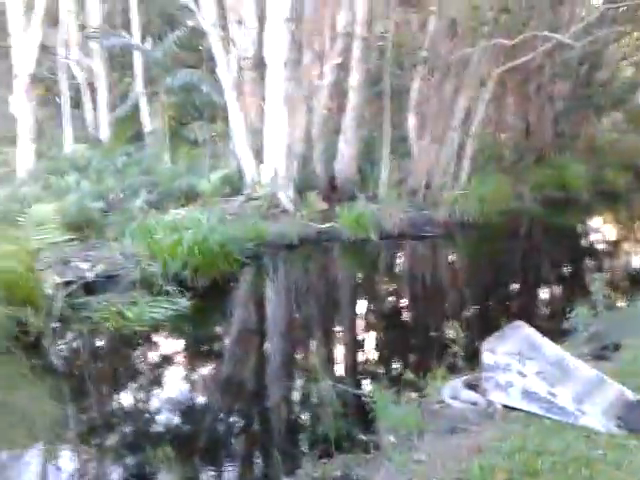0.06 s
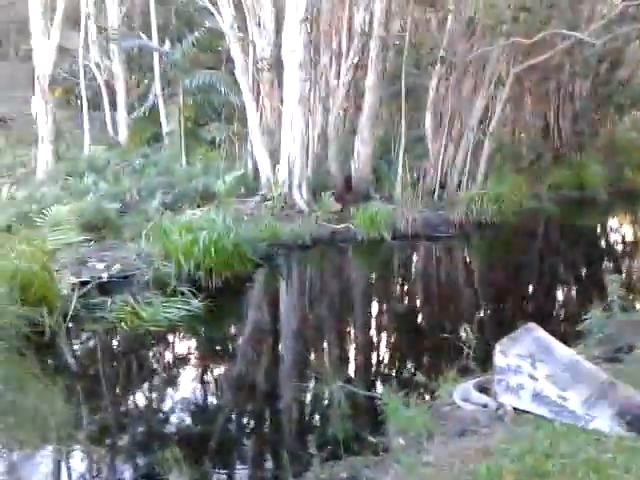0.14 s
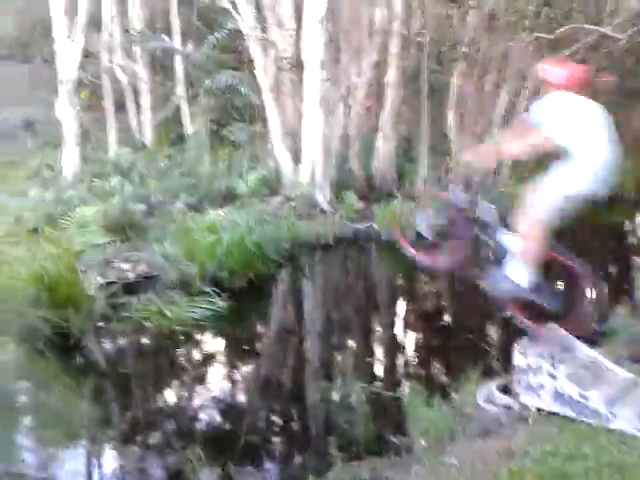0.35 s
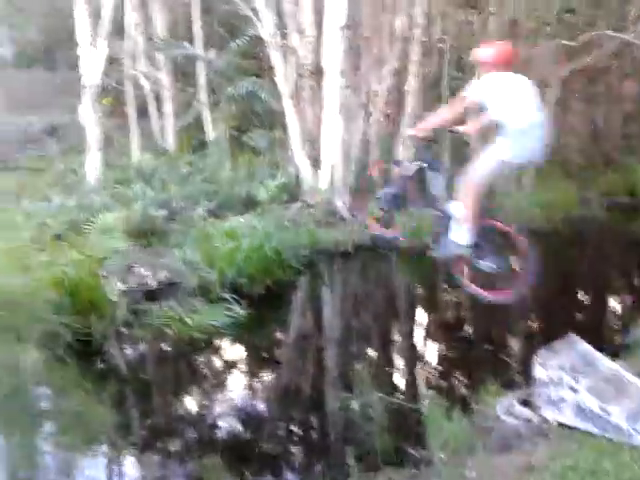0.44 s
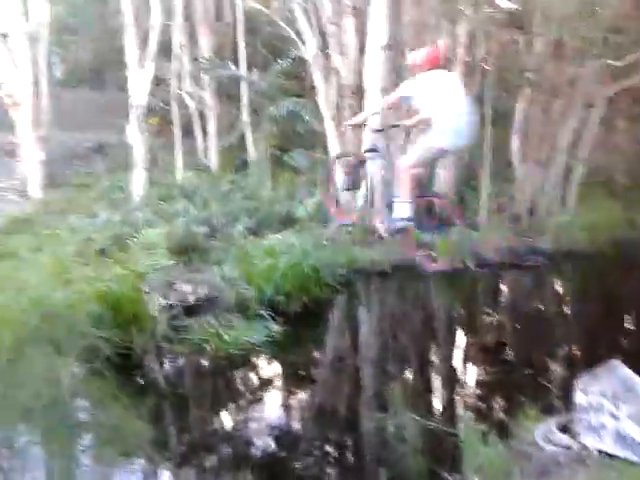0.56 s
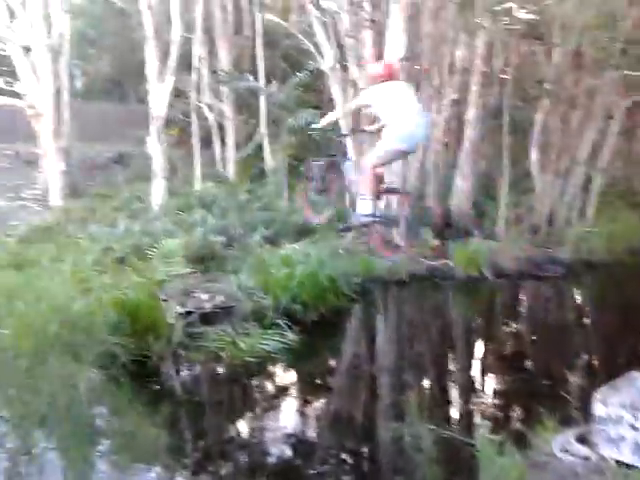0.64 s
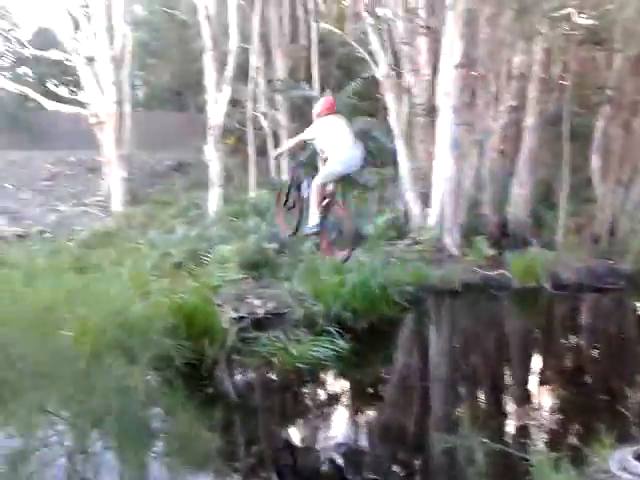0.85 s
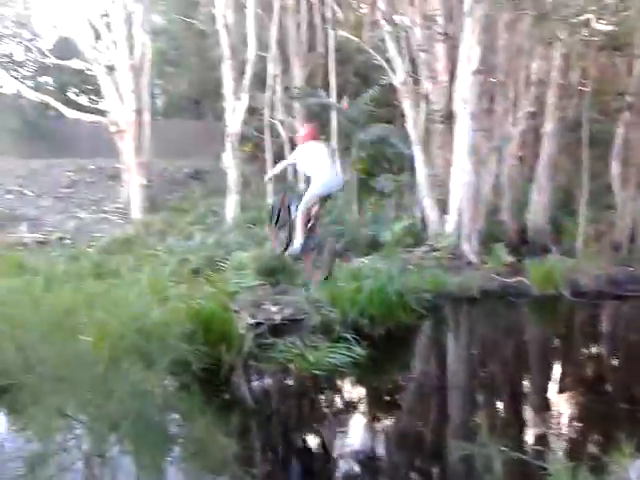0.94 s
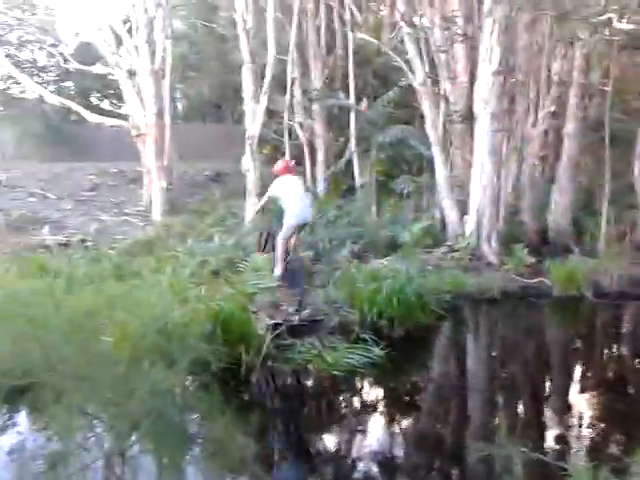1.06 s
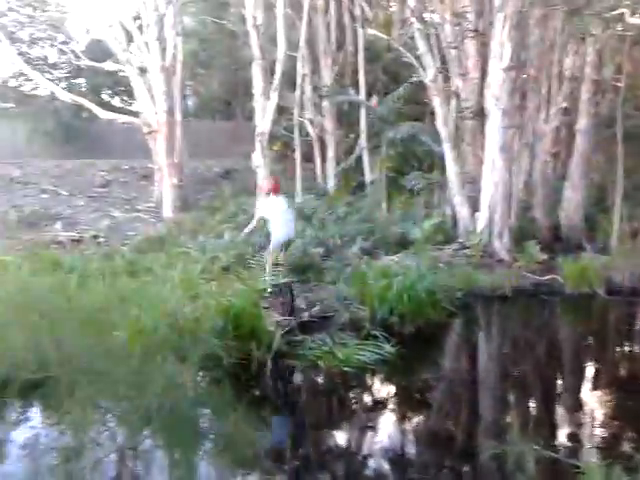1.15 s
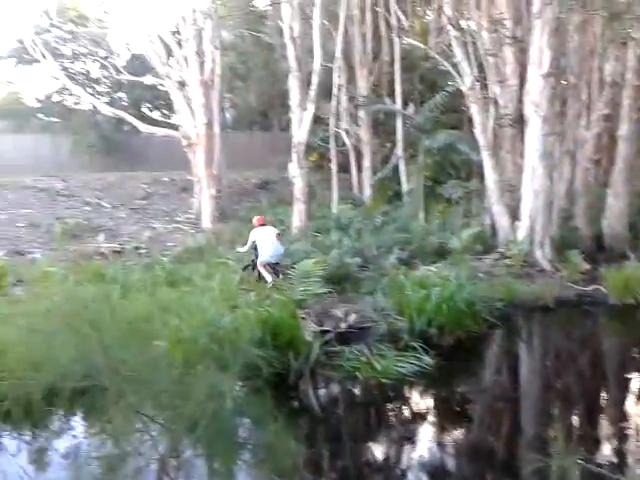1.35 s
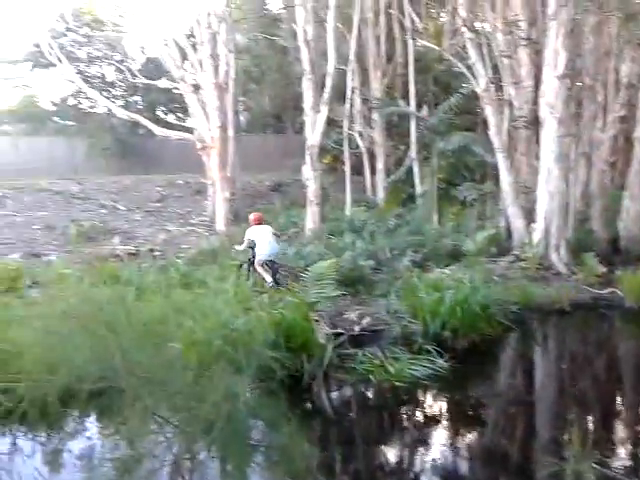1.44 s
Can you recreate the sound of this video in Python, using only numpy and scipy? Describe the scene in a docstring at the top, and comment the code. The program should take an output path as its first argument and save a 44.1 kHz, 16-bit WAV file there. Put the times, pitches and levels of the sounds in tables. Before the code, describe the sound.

A bicycle coasts up with a hissing freewheel and hits a board ramp close by, with two clacking, booming thumps at about 0.2 and 0.3 seconds, the second loudest. The hiss fades as it flies away. At about 1.2 seconds it lands more quietly with a sharp, hollow knock and a crunch of dirt and twigs, rattling lightly until 1.5 seconds. Light wind rumbles underneath.

```python
"""A creek bank outdoors, one microphone by a board ramp: a bicycle coasts up, jumps and lands across it.
Close by, each wheel clacks on the lip and thumps the board into a boom, and the tyre tread hums over it.
The freewheel's pawls hiss away through the air. On the far bank the tyres crunch into dirt and twigs
and the bike rattles on. Light wind and a distant outdoor wash lie underneath."""
import sys
import numpy as np
from scipy import signal
from scipy.fft import rfft, irfft
from scipy.io import wavfile

SR = 44100
rng = np.random.default_rng(int(sys.argv[2]) if len(sys.argv) > 2 else 0)


def transcribe(u):
    """Save the signal u as a 16-bit wav file named by the first command-line argument.

    u: samples, shape (n,) or (channels, n), limited to [-1, 1]; the rate is SR.
    q: integer samples, one column per channel.
    """
    v = np.clip(np.atleast_2d(u).T, -1, 1)
    q = np.round(v * 32767).astype(np.int16)
    wavfile.write(sys.argv[1], SR, q)


N = 66150
TIME = np.arange(N) / SR

# spectrum of chatter and scuffing on the ramp: (frequency [Hz], level [dB])
CHATTER_SPECTRUM = [(60, -8.5), (200, -6.5), (400, -7), (1100, -7), (1450, -20.5), (1900, -16),
                    (3500, -17.5), (6000, -19), (9000, -32), (16000, -52)]


def from_db(db):
    """Decibels to gain."""
    return 10 ** (np.asarray(db) / 20)


def unit_rms(x):
    """Scale to unit power."""
    return x / np.sqrt(np.mean(x ** 2) + 1e-20)


def fader(points):
    """Gain over time from (time [s], level [dB]) points."""
    return from_db(np.interp(TIME, *np.transpose(points)))


def drift(rate_hz):
    """Smooth random wander of unit power."""
    pole = np.exp(-2 * np.pi * rate_hz / SR)
    return unit_rms(signal.lfilter([1], [1, -2 * pole, pole * pole], rng.standard_normal(2 * N))[N:])


def colour(x, spectrum):
    """Causal filter of unit power gain along (frequency [Hz], level [dB]) points."""
    size = 2 * N
    hz, db = np.transpose(spectrum)
    freqs = np.maximum(np.fft.rfftfreq(size, 1 / SR), 1)
    octaves_outside = np.maximum(np.log2(freqs / hz[-1]), 0) + np.maximum(np.log2(hz[0] / freqs), 0)
    gain = unit_rms(from_db(np.interp(np.log(freqs), np.log(hz), db) - 10 * octaves_outside))
    cepstrum = irfft(np.log(gain))
    cepstrum[1:N] *= 2  # fold to minimum phase
    cepstrum[N + 1:] = 0
    return irfft(rfft(x, size) * np.exp(rfft(cepstrum)))[:N]


def noise(spectrum):
    """Steady coloured noise, already under way at the start."""
    return colour(rng.standard_normal(2 * N), spectrum)


def burst(peak_s, rise_s, t60):
    """Envelope that climbs 20 dB per rise_s to its peak, then falls 60 dB in t60 seconds."""
    return from_db(-20 * np.maximum(peak_s - TIME, 0) / rise_s - 60 * np.maximum(TIME - peak_s, 0) / t60)


def grains(per_s=7000, spread_db=1):
    """Dense tiny clicks of uneven size."""
    sizes = from_db(spread_db * np.minimum(rng.exponential(1, N), 4)) * rng.choice([-1, 1], N)
    return unit_rms(sizes * (rng.random(N) < per_s / SR))


def ring(force, hz, t60):
    """One mode: a unit click sets a sine of height 1 ringing."""
    decay, step = from_db(-60 / (t60 * SR)), 2 * np.pi * hz / SR
    return signal.lfilter([0, np.sin(step)], [1, -2 * decay * np.cos(step), decay * decay], force + 1e-18)


def push(start_s, contact_s):
    """A soft contact: a rounded force pulse of unit area."""
    age = np.maximum(TIME - start_s, 0) / contact_s
    pulse = age * np.exp(-2 * np.pi * age)
    return pulse / pulse.sum()


def board_booms(start_hz=111.7, end_hz=48, settle_s=0.015, rise_s=0.0072):
    """The loaded board swings for a few cycles, sinking in pitch as the wheel leaves."""
    # each wheel flexes the board: (time [s], level [dB])
    flexes = [(.2190, -11), (.3200, -2.5)]
    out = np.zeros(N)
    for s, db in flexes:
        age = np.maximum(TIME - s, 0)
        cycles = end_hz * age + (start_hz - end_hz) * settle_s * (1 - np.exp(-age / settle_s))
        swell = age / rise_s * np.exp(1 - age / rise_s)
        out -= from_db(db) * swell * np.sin(2 * np.pi * cycles)
    return out


def ramp_knocks():
    """The wheels knock the board into its modes and set loose parts chattering."""
    # wheel strikes and rebounds: (time [s], level [dB], contact [s])
    thumps = [(.2100, -17.5, 0.0023), (.2200, -14.5, 0.0036), (.3100, -16.5, 0.0019), (.3205, -7, 0.0023),
              (0.347, -10, 0.0031)]
    # modes of the board: (frequency [Hz], level [dB], t60 [s])
    modes = [(126, -16, 0.12), (184.3, -2.5, 0.079), (223, -4.5, 0.09), (356.3, -2.5, .12),
             (412.5, -5.5, .11), (473.4, -10, .1), (582, -12, 0.079), (660, -6, 0.052), (733, -9, 0.088),
             (980, -14, .07), (1175, -12, 0.067)]
    # each wheel shakes ramp and bike: (time [s], level [dB], t60 [s])
    shakes = [(0.223, -24.5, 0.18), (0.321, -19, 0.17)]
    force = -sum(from_db(db) * push(s, contact_s) for s, db, contact_s in thumps)
    ringing = sum(from_db(db) * ring(force, hz, t60) for hz, db, t60 in modes)
    shaking = sum(from_db(db) * burst(s, rise_s=0.034, t60=t60) for s, db, t60 in shakes)
    return ringing + colour(shaking * grains(), CHATTER_SPECTRUM)


def clacks(top_hz=8600):
    """Rim, chain and frame knock hard: short cracks, each through one broad resonance."""
    # hard knocks: (time [s], level [dB], t60 [s], centre [Hz], width [share of centre])
    knocks = [(.021, -35, 0.017, 3500, .6), (0.2089, -19, 0.0085, 4700, .5),
              (.2153, -19.5, 0.0076, 3560, 0.33), (0.223, -24, 0.043, 4950, 0.49),
              (.3100, -12.5, 0.0086, 5900, 0.44), (0.3147, -17.5, 0.0073, 4150, .6),
              (0.327, -11.5, 0.01, 5260, 0.98), (1.1982, -18, 0.014, 5240, 0.38),
              (1.2062, -15.5, 0.01, 4870, 0.53), (1.2656, -18, 0.015, 2970, 1.3),
              (1.404, -37.5, 0.046, 1900, .8), (1.462, -38, 0.085, 1700, .8),
              (1.4687, -30, 0.012, 5300, 0.48)]
    lowpass = signal.butter(4, top_hz, fs=SR, output="sos")
    out = np.zeros(N)
    for s, db, t60, hz, width in knocks:
        edges_hz = [hz / (1 + width / 2), hz * (1 + width / 2)]
        resonance = signal.butter(1, edges_hz, "band", fs=SR, output="sos")
        crack = signal.sosfilt(lowpass, signal.sosfilt(resonance, rng.standard_normal(N)))
        out += from_db(db) * burst(s, rise_s=0.00053, t60=t60) * unit_rms(crack)
    return out


def tread_hum(edge_s=0.018, sag_hz_per_s=700, wobble=0.027, flutter=0.55, overtone_db=-12, scuff_db=-3):
    """Tyre knobs drum unevenly on the board, sinking in pitch as the bike climbs."""
    # each tyre's pass: (start [s], end [s], starting pitch [Hz], level [dB])
    passes = [(.255, 0.32, 642, -30), (.385, 0.423, 500, -36)]
    out = np.zeros(N)
    for start, end, start_hz, db in passes:
        on_board = np.clip(np.minimum(TIME - start, end - TIME) / edge_s + .5, 0, 1)
        hz = (start_hz - sag_hz_per_s * (TIME - start)) * (1 + wobble * drift(rate_hz=60))
        phase = 2 * np.pi * np.cumsum(hz) / SR
        grip = 1 + flutter * drift(rate_hz=90)
        hum = unit_rms(grip * (np.sin(phase) + from_db(overtone_db) * np.sin(2 * phase)))
        scuff = from_db(scuff_db) * colour(grains(), CHATTER_SPECTRUM)
        out += from_db(db) * on_board * (hum + scuff)
    return out


def touchdown():
    """The wheels hit the far bank and the whole bike gives a hollow knock."""
    # wheel strikes: (time [s], level [dB])
    strikes = [(1.1886, -23.5), (1.1975, -27), (1.2056, -25)]
    # modes of tyre, rim and frame: (frequency [Hz], level [dB], t60 [s])
    modes = [(271.4, 2, 0.09), (535, 1, 0.058), (802, 1, 0.057), (914, 1, .05), (1033, -3, .05),
             (1218, -1, 0.058), (1696, -4, 0.081), (2100, 1, 0.043), (2240, -7, .05)]
    force = sum(from_db(db) * push(s, contact_s=0.00063) for s, db in strikes)
    return sum((-1) ** k * from_db(db) * ring(force, hz, t60) for k, (hz, db, t60) in enumerate(modes))


def far_bank(roll_db=-42.5, thud_db=-33, skid_db=-33):
    """Dirt and twigs crunch under the landing; the rear tyre thuds, skids and rolls on."""
    # tyres bite into the bank: (time [s], level [dB], t60 [s])
    bites = [(1.190, -22.5, 0.07), (1.204, -26, 0.17), (1.243, -34.5, .25)]
    # crunching dirt, thudding soil and skidded grass, each (frequency [Hz], level [dB])
    dirt_spectrum = [(60, -7), (230, -3.5), (600, -7.5), (950, -5), (1250, -10.5), (1500, -19),
                     (2000, -6.5), (2600, -11.5), (5400, -7), (7500, -14.5), (10000, -23), (13000, -29),
                     (15500, -51)]
    soil_spectrum = [(60, -3), (150, 1), (300, -2.5), (480, 1), (700, -20), (1500, -32)]
    grass_spectrum = [(1500, -16), (3500, -4), (6000, -1), (8500, -7), (11000, -14), (13500, -23),
                      (16000, -36)]
    bite = sum(from_db(db) * burst(s, rise_s=0.0098, t60=t60) for s, db, t60 in bites)
    roll = from_db(roll_db) * (TIME > bites[0][0])
    thud = from_db(thud_db) * burst(1.25, rise_s=0.043, t60=0.29) * noise(soil_spectrum)
    skid = from_db(skid_db) * burst(1.286, rise_s=0.075, t60=0.29) * colour(grains(), grass_spectrum)
    crunch = colour(np.hypot(bite, roll) * grains(), dirt_spectrum)
    return crunch + thud + skid


def low_bumps():
    """The ramp drops back, then the bike bottoms out: soft, heavy contacts, felt more than heard."""
    # dull bumps: (time [s], level [dB], frequency [Hz], t60 [s])
    bumps = [(0.393, -13, 41.5, 0.098), (1.25, -22, 50, 0.16)]
    return -sum(from_db(db) * ring(push(s, contact_s=0.012), hz, t60) for s, db, hz, t60 in bumps)


def freewheel(pawl_hz=260.6, pawl_depth=0.083):
    """Pawl ticks run together into a bright hiss that fades with distance."""
    # hiss at the microphone: (time [s], level [dB])
    levels = [(0, -35), (.1, -32.5), (.19, -34.5), (.27, -42.5), (.36, -35), (.46, -37.5), (.6, -42),
              (.8, -42), (1.02, -42), (1.17, -47.5), (1.5, -54)]
    # spectrum of the hiss: (frequency [Hz], level [dB])
    spectrum = [(2000, -19), (4300, -18), (5300, -8), (6300, -1.5), (7500, -6.5), (9000, -12.5),
                (11000, -25), (15500, -41)]
    phase = 2 * np.pi * np.cumsum(pawl_hz * (1 + .03 * drift(rate_hz=5.4))) / SR
    ticks = unit_rms((1 + pawl_depth * np.cos(phase)) * rng.standard_normal(N))
    return fader(levels) * colour(ticks, spectrum)


def chain_rattle(peak_db=-35.5):
    """The links tick in a brief bright spray as the rear wheel slams onto the board."""
    # spectrum of the links: (frequency [Hz], level [dB])
    spectrum = [(3000, -17), (7000, -5), (10000, 5), (15500, -6)]
    return from_db(peak_db) * burst(0.327, rise_s=0.016, t60=0.041) * colour(grains(), spectrum)


def grass_swish():
    """Grass brushes the tyres on the run-up, falling away as the bike takes off."""
    # swish at the microphone: (time [s], level [dB])
    levels = [(0, -48), (.2, -44), (.38, -38), (.46, -56)]
    # spectrum of the swish: (frequency [Hz], level [dB])
    spectrum = [(600, -3), (1000, 0), (1500, -5.5), (3200, 0), (6000, -2), (10000, -13), (15000, -27)]
    return fader(levels) * colour(grains(), spectrum)


def background(wash_db=-43):
    """Wind and rolling tyres rumble; the ground and the settling ramp drum; a far wash lies behind."""
    # rumble and drumming at the microphone, each (time [s], level [dB])
    rumble_levels = [(0, -30), (.04, -32.5), (.1, -30.5), (.18, -33.5), (.3, -24.5), (.4, -32.5),
                     (.47, -33.5), (.58, -41.5), (.84, -47.5), (.92, -41.5), (1.01, -35.5), (1.1, -39),
                     (1.16, -43), (1.5, -47)]
    drumming_levels = [(0, -28.5), (.04, -36.5), (.1, -35.5), (.18, -41.5), (.28, -38), (.38, -35.5),
                       (.5, -38.5), (.6, -49), (1.1, -61.5), (1.5, -46)]
    # spectra of the three layers, each (frequency [Hz], level [dB])
    rumble_spectrum = [(20, -1.5), (42, 1), (75, -2), (125, -14.5), (250, -27), (600, -46.5)]
    drumming_spectrum = [(50, -32.5), (120, 5), (230, 0), (400, -13), (1000, -25), (4000, -45)]
    wash_spectrum = [(25, -8), (150, -2.5), (320, -4.5), (800, -0.5), (1150, -5), (1600, -12.5),
                     (2400, -16.5), (4000, -31), (8000, -30), (16000, -39)]
    rumble = fader(rumble_levels) * noise(rumble_spectrum)
    drumming = fader(drumming_levels) * noise(drumming_spectrum)
    return rumble + drumming + from_db(wash_db) * noise(wash_spectrum)


def scene():
    """Both banks reach one microphone, the same in both channels."""
    take_off = grass_swish() + tread_hum() + board_booms() + ramp_knocks() + chain_rattle()
    landing = touchdown() + far_bank()
    return np.tile(take_off + landing + low_bumps() + clacks() + freewheel() + background(), (2, 1))


def record(dry, clip_level=0.68, stop_hz=17000):
    """The heaviest thump overloads the microphone input; a steep filter cuts the top."""
    lowpass = signal.cheby2(12, 70, stop_hz, fs=SR, output="sos")
    return signal.sosfilt(lowpass, np.clip(dry, -clip_level, clip_level))


dry = scene()
out = record(dry)
transcribe(out)
```